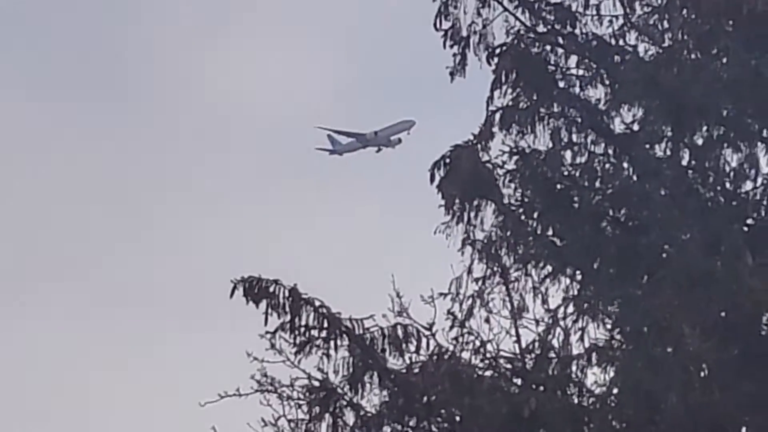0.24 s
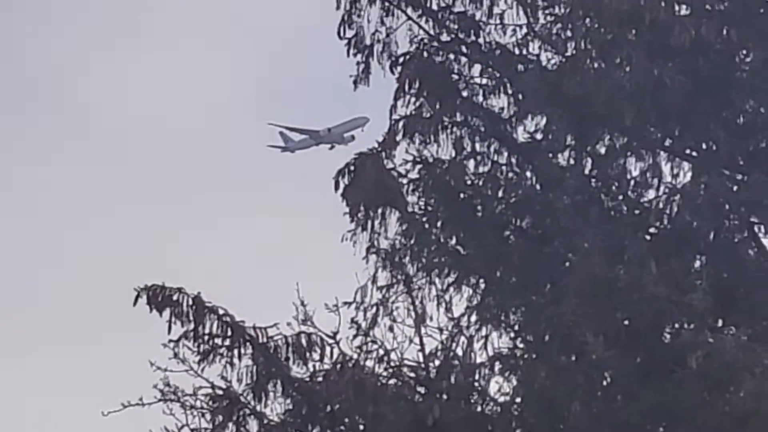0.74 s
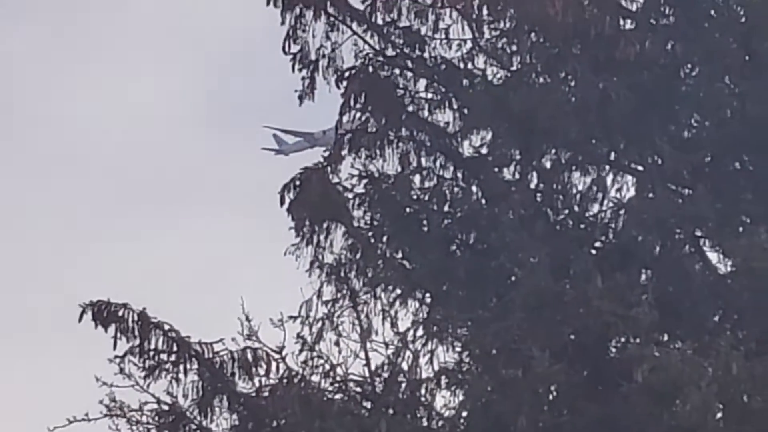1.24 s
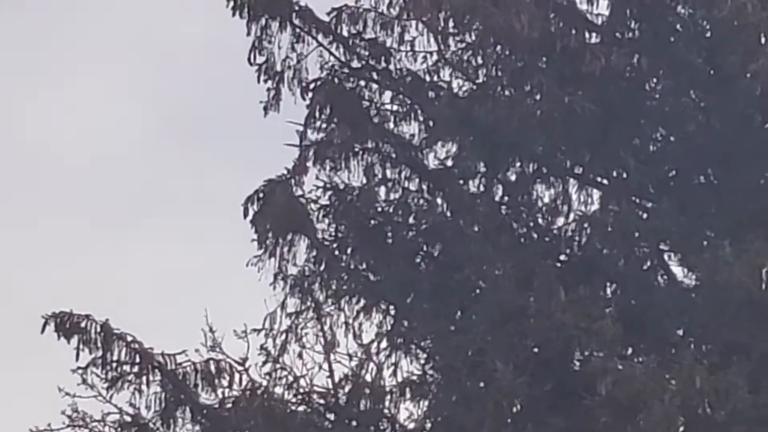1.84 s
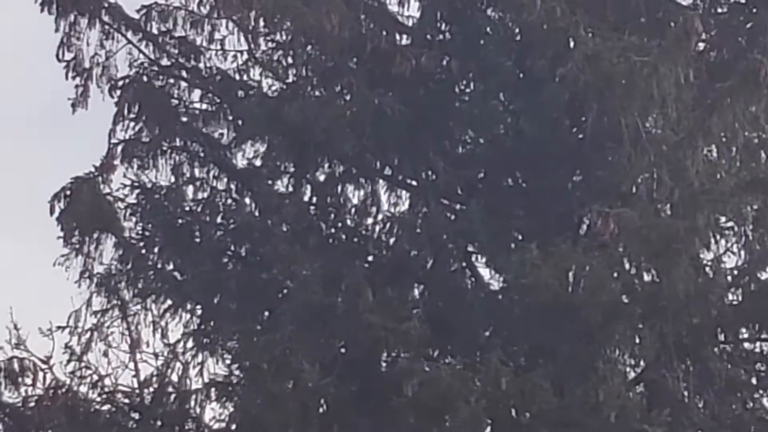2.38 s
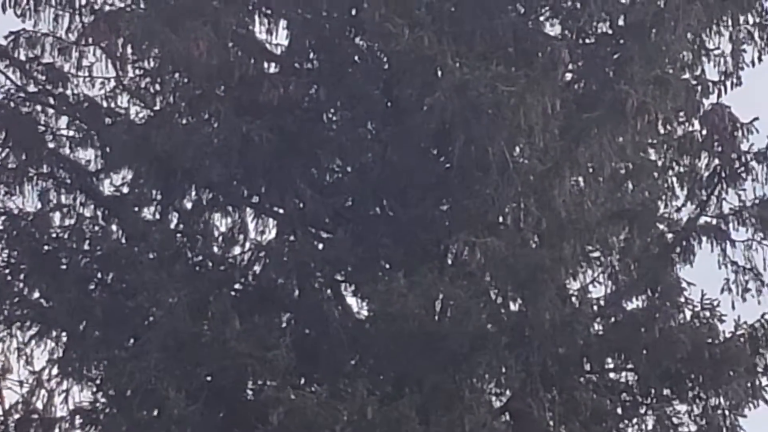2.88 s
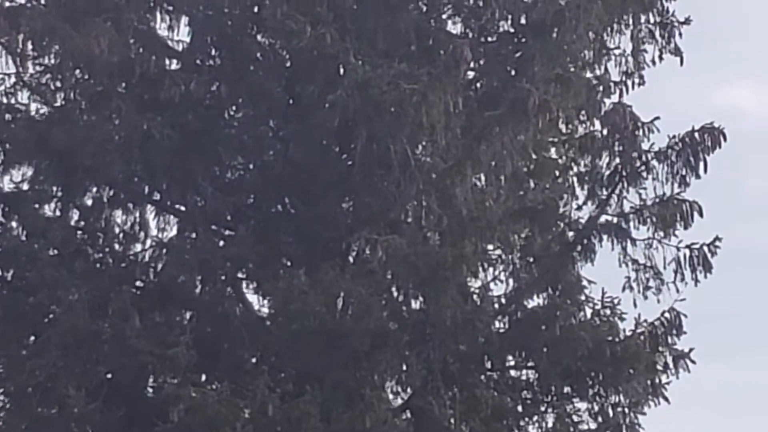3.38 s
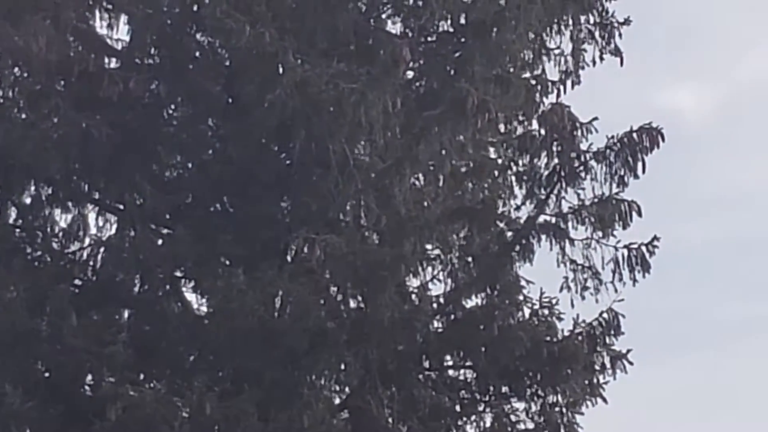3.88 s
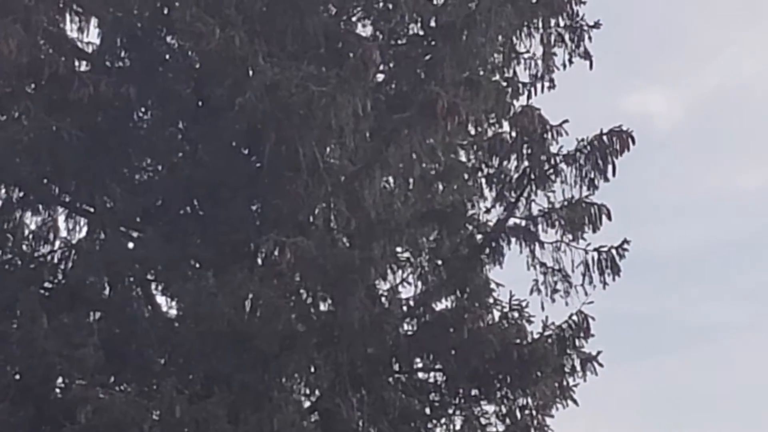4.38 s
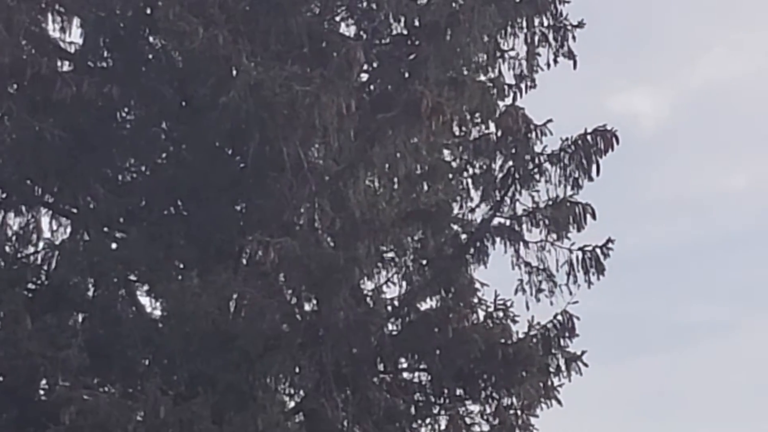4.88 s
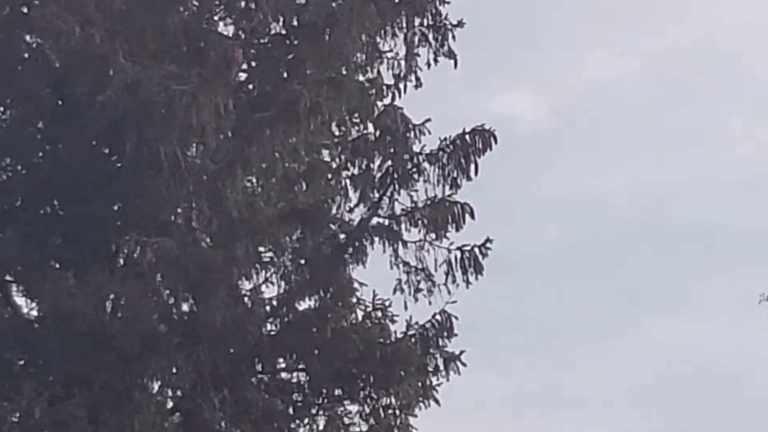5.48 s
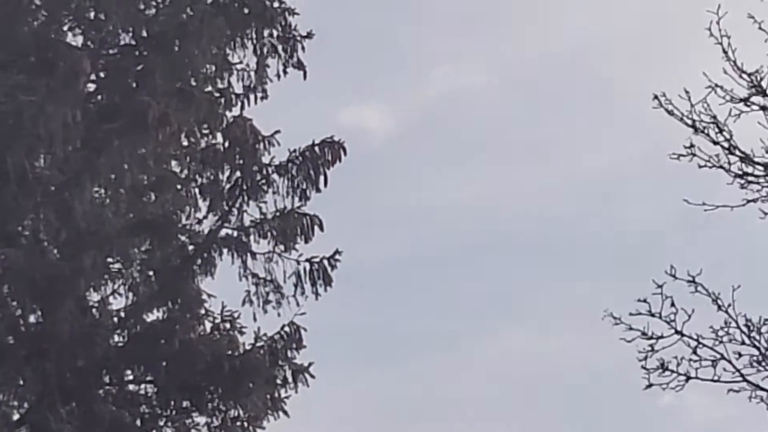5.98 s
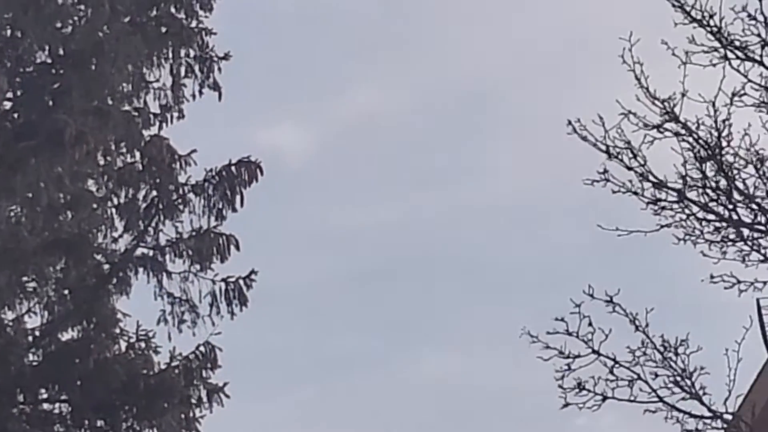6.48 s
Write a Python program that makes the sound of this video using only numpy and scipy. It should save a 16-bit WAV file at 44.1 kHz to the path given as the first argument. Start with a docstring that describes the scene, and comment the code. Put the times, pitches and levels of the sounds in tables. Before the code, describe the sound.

A distant jet airliner rumbles steadily overhead while small songbirds chirp and whistle in the surrounding trees.

```python
"""A rumble and roar fill the sky: the turbulent exhaust of a jet airliner far overhead, swelling and
fading in the moving air, with a fuzzy engine drone that sinks slowly in pitch as the jet recedes.
Songbirds call with gliding tones of the syrinx; conifers scatter each call into a short tail, and
buildings echo the nearer ones. Close by, something rustles and snaps over a faint microphone hiss."""
import sys
import numpy as np
from scipy import signal
from scipy.fft import rfft, irfft, next_fast_len
from scipy.io import wavfile
from scipy.ndimage import uniform_filter1d, map_coordinates

SR = 44100
rng = np.random.default_rng(int(sys.argv[2]) if len(sys.argv) > 2 else 0)


def output_pcm(signal):
    """Save a mono or channel-first signal as 16-bit PCM at the path in sys.argv[1].

    Samples are clipped to [-1, 1] before scaling.
    """
    pcm = np.clip(np.atleast_2d(signal).T, -1, 1) * 32767
    wavfile.write(sys.argv[1], SR, np.round(pcm).astype(np.int16))


N = 296793


def amp(db):
    """Decibels to amplitude gain."""
    return 10 ** (np.asarray(db) / 20)


def unit(x):
    """Normalisation to rms 1."""
    return x / np.sqrt(np.mean(x ** 2) + 1e-20)


def along(points, hz):
    """Interpolation of (Hz, value) points on a logarithmic frequency axis."""
    knots_hz, values = np.transpose(points)
    return np.interp(np.log(hz + 1), np.log(knots_hz + 1), values)


def curves(rows, size=N):
    """Linear interpolation in time: one value per sample for each column after the first."""
    times, *columns = np.transpose(rows)
    return [np.interp(np.arange(size) / SR, times, column) for column in columns]


def wobble(rate, size=N):
    """Smooth random modulation: a spline through rate random knots a second."""
    knots = rng.standard_normal(int(size * rate / SR) + 4)
    return map_coordinates(knots, [np.arange(size) * rate / SR])


def filtered(x, response):
    """Linear filtering: the spectrum of x times a complex response of frequency."""
    size = x.shape[-1]
    padded = next_fast_len(size + SR // 8)
    return irfft(rfft(x, padded) * response(np.fft.rfftfreq(padded, 1 / SR)), padded)[..., :size]


def coloured_noise(spectrum):
    """Spectral shaping: independent white noise in each channel, weighted by (Hz, dB) points."""
    return filtered(rng.standard_normal((2, N)), lambda hz: amp(along(spectrum, hz)))


def add(track, start_s, sound):
    """Superposition: the sound is summed into the track from start_s on."""
    part = track[..., max(round(start_s * SR), 0):][..., :sound.shape[-1]]
    part += sound[..., :part.shape[-1]]


def placed(x, lead_ms, pan_db):
    """Time and level cues to direction: the left channel is earlier by lead_ms and louder by pan_db."""
    half = np.array([[.5], [-.5]])
    return filtered(x, lambda hz: amp(half * pan_db) * np.exp(2j * np.pi * hz * half * lead_ms / 1000))


# Spectrum of the hiss. Each row: frequency in Hz, relative spectral density in dB.
HISS_SPECTRUM = [(1000, -8), (4000, -4), (7500, -5), (10000, -3), (13000, -1), (16000, 0)]

def hiss(level_db=-76.5):
    """Self-noise of the microphone: steady, and uncorrelated between the channels."""
    return amp(level_db) * unit(coloured_noise(HISS_SPECTRUM))


# Close scrapes. Each row: start in seconds, length in seconds, level in dB.
SCRAPES = [(3.35, .03, -73), (3.835, .04, -65), (4.01, .04, -70), (4.125, .05, -64), (4.15, .03, -60),
           (4.32, .035, -67), (4.428, .035, -71)]
# Their spectrum. Each row: frequency in Hz, relative spectral density in dB.
RUSTLE_SPECTRUM = [(1500, -20), (4500, 3), (7500, -8), (10000, -4), (13000, -1), (15500, 2)]

def rustle(grain_db=2.5, crackle_db=-73, crackle_start_s=2.9, crackle_length_s=2.1):
    """Random amplitude modulation breaks noise into grains: dry scrapes over a faint swell of crackle."""
    envelope = np.zeros(N)
    add(envelope, crackle_start_s, amp(crackle_db) * np.hanning(round(crackle_length_s * SR)))
    for start_s, length_s, db in SCRAPES:
        add(envelope, start_s, amp(db) * np.hanning(round(length_s * SR)))
    grains = unit(coloured_noise(RUSTLE_SPECTRUM) * amp(grain_db * wobble(280)))
    return placed(envelope * grains, lead_ms=0, pan_db=6)


# Dry snaps among the scrapes. Each row: start in seconds, level in dB.
SNAP_EVENTS = [(3.971, -54), (4.179, -48)]
# Their spectrum. Each row: frequency in Hz, relative spectral density in dB.
SNAP_SPECTRUM = [(1000, -10), (3500, 6), (5000, 3), (7500, -6), (11000, -3), (15500, -3)]

def snaps(t60_s=.025):
    """Damped transients: little cracks of noise with a sudden onset and an exponential decay."""
    t = np.arange(SR // 10) / SR
    envelope = np.zeros(N)
    for start_s, db in SNAP_EVENTS:
        add(envelope, start_s, amp(db - 60 * t / t60_s))
    return envelope * unit(coloured_noise(SNAP_SPECTRUM))


# Reverberation of the conifers. Each row: frequency in Hz, time to decay by 60 dB in seconds.
TREE_T60 = [(2000, 0.5), (4500, 0.74), (7000, 0.86), (15000, 0.082)]

def among_trees(x, wet_db, early_gain=0.94, early_t60_s=0.082):
    """Multiple scattering by trunks and branches: a quick dense answer, then a longer tail."""
    hz, t, noise = signal.stft(rng.standard_normal((2, SR * 3 // 4)), SR, nperseg=256)
    late = amp(-60 * t / along(TREE_T60, hz)[:, None])
    early = early_gain * amp(-60 * t / early_t60_s)
    response = signal.istft(noise * (late + early) * (t > 0), SR, nperseg=256)[1]
    response /= np.linalg.norm(response[0])
    return amp(wet_db) * signal.fftconvolve(x[None], response, axes=1)[:, :len(x)]


def syllable(shape, rough, octave_db, trill=0, trill_hz=130, flutter_db=3, jitter_per_s=600):
    """One side of a syrinx as an oscillator: a gliding tone, frequency-modulated by jitter and trill."""
    t = np.arange(SR) / SR
    pitch, level = curves(shape, size=SR)
    gate = np.clip(np.minimum(t - shape[0][0], shape[-1][0] - t) / .004, 0, 1)  # 4 ms ramps
    jitter = rough * wobble(jitter_per_s, size=SR)
    vibrato = trill * np.sin(2 * np.pi * trill_hz * t)
    phase = 2 * np.pi * np.cumsum(pitch * (1 + jitter + vibrato)) / SR
    envelope = gate * amp(level + flutter_db * wobble(120, size=SR))
    return envelope * (np.sin(phase) + amp(octave_db) * np.sin(2 * phase))


# Distant chips. Each row: start and length in seconds, first, middle and last pitch in Hz,
# relative level in dB.
FAR_CHIPS = [(.47, 0.093, 2304, 2900, 2680, -57), (0.542, .091, 2700, 2820, 3110, -55.5),
             (1.706, 0.061, 3410, 3970, 6050, -54), (1.727, .049, 4700, 3900, 2845, -52.5),
             (1.865, 0.097, 2950, 3450, 2930, -56.5), (2.259, 0.064, 3700, 3130, 2785, -51.5),
             (2.335, 0.045, 3620, 3290, 2950, -53.5), (2.786, 0.085, 4230, 3490, 3310, -55),
             (3.439, 0.043, 5560, 4930, 4830, -61.5), (3.469, 0.044, 3740, 3350, 3030, -53.5),
             (3.57, 0.074, 3600, 4170, 4440, -51.5), (4.172, 0.072, 3740, 3240, 2920, -56.5),
             (4.791, 0.063, 3430, 3370, 2910, -56), (5.245, .1, 3610, 4550, 3670, -66),
             (5.593, 0.074, 5260, 4880, 4400, -63), (5.668, 0.075, 3200, 3780, 3960, -55.5),
             (5.718, .048, 4320, 4600, 4200, -53.5), (5.723, 0.039, 3630, 3210, 2910, -54),
             (6.608, 0.081, 3460, 3190, 2860, -61.5)]

def far_birds(level_db=-2):
    """Short husky chips from deep in the trees, where scattered sound outweighs the direct path."""
    out = np.zeros((2, N))
    for start_s, length_s, first_hz, middle_hz, last_hz, db in FAR_CHIPS:
        shape = [(0, first_hz, -8), (length_s / 2, middle_hz, 0), (length_s, last_hz, -8)]
        voice = amp(db + level_db) * syllable(shape, rough=.055, octave_db=-29.5, jitter_per_s=1200)
        add(out, start_s, placed(voice, lead_ms=-0.036, pan_db=8) + among_trees(voice, wet_db=3.5))
    return out


# Syllables of the rising call. Each row: time in the call in seconds, pitch in Hz, relative level in dB.
SQUEAK = [(0, 5030, -26.5), (.02, 5460, -21), (.045, 5960, -30)]
RISE = [(0, 2850, -26.5), (.025, 3080, -8), (.045, 3310, -3.5), (.058, 3780, -5), (.082, 4170, -1.5),
        (.105, 4460, -6), (.125, 4140, -3.5), (.145, 4000, -19)]

def upslur(tune):
    """A rising call, made husky by fast frequency modulation, opens with a thin high squeak."""
    squeak = syllable(SQUEAK * tune, rough=0.048, octave_db=-53, jitter_per_s=1500)
    rise = syllable(RISE * tune, rough=.025, octave_db=-41, trill=0.026, trill_hz=126.2)
    return squeak + rise


# Syllables of the whistle. Each row: time in the call in seconds, pitch in Hz, relative level in dB.
CLEAR_NOTE = [(0, 4650, 5.5), (.008, 4783, -8.5), (.042, 4803, 1.5), (.054, 4700, -1.5), (.064, 4390, -33)]
FALLING_LISP = [(.058, 6850, -25), (.075, 6580, -24), (.115, 6150, -14.5), (.126, 5710, -23)]
LAST_NOTE = [(.12, 4450, -17), (.128, 4330, -3.5), (.145, 4280, -7.5), (.16, 4274, -27)]

def whistle(tune):
    """Nearly sinusoidal oscillation: a clean note, a thin falling lisp and a lower last note."""
    lisp = syllable(FALLING_LISP * tune, rough=0.018, octave_db=-47)
    clear_note = syllable(CLEAR_NOTE * tune, rough=0.0025, octave_db=-34)
    last_note = syllable(LAST_NOTE * tune, rough=.004, octave_db=-39)
    return clear_note + lisp + last_note


# Syllables of the chirrup. Each row: time in the call in seconds, pitch in Hz, relative level in dB.
FALLING_RASP = [(0, 5300, -36), (.02, 5200, -15), (.035, 4700, -15.5), (.05, 4150, -9.5),
                (.075, 3700, -13.5), (.09, 4200, -8.5), (.11, 4300, -18)]
LOWER_VOICE = [(.005, 2654, -24.5), (.025, 2650, -13.5), (.045, 2500, -26), (.085, 2900, -22),
               (.105, 2620, -12), (.12, 2770, 1.5), (.155, 2738, -8), (.172, 2880, -27)]
UPPER_VOICE = [(.105, 3010, -18.5), (.125, 3180, -8.5), (.155, 3150, -10.5), (.172, 3100, -21)]

def chirrup(tune, lower_ratio=0.67, lower_db=-6):
    """Biphonation: both sides of the syrinx rasp in a falling tumble, then land on a two-voiced note."""
    rasp = syllable(FALLING_RASP * tune, rough=0.09, octave_db=-43, trill=.04, trill_hz=84.3,
                    flutter_db=0.5, jitter_per_s=1800)
    lower_shape = FALLING_RASP[2:] * tune * [1, lower_ratio, 1]
    rasp += amp(lower_db) * syllable(lower_shape, rough=.11, octave_db=-25, jitter_per_s=1500)
    lower_voice = syllable(LOWER_VOICE * tune, rough=0.036, octave_db=-30)
    upper_voice = syllable(UPPER_VOICE * tune, rough=.025, octave_db=-23.5)
    return rasp + lower_voice + upper_voice


# Echoes from nearby buildings. Each row: delay in seconds, relative level in dB.
WALL_ECHOES = [(.083, -14), (.15, -19.5), (.21, -21)]

def bird(calls, song, wet_db, echo_db, lead_ms, pan_db):
    """Multipath propagation: each call arrives directly, scattered by trees and reflected by walls."""
    out = np.zeros((2, N))
    for start_s, db, pitch_ratio in calls:
        tune = np.array([1, pitch_ratio, 1])  # scales only a syllable's pitch column
        voice = amp(db) * song(tune)
        direct = placed(voice, lead_ms, pan_db)
        scattered = placed(among_trees(voice, wet_db), 0, pan_db)
        add(out, start_s, direct + scattered)
        for delay_s, wall_db in WALL_ECHOES:
            echo = placed(voice, lead_ms=rng.normal(0, .2), pan_db=0)
            add(out, start_s + delay_s, amp(wall_db + echo_db) * echo)
    return out


# Calls of the three nearer birds. Each row: start in seconds, gain in dB, pitch ratio.
UPSLUR_CALLS = [(.134, -36, 1), (.926, -37.5, 1.01)]
WHISTLE_CALLS = [(.462, -51.5, 0.99), (1.035, -54, 1), (1.668, -51.5, 1), (2.25, -52.5, 1),
                 (2.835, -49.5, 0.98), (3.632, -49.5, 1), (4.752, -53.5, 0.98), (6.048, -48.5, .995)]
CHIRRUP_CALLS = [(2.508, -38, 1.014), (4.628, -40.5, .98), (6.272, -39.5, 1.005)]

def near_birds():
    """Stationary point sources: three perched birds repeat their songs, each from its own direction."""
    return (bird(UPSLUR_CALLS, upslur, wet_db=-4.5, echo_db=-11.5, lead_ms=-0.12, pan_db=1.7)
            + bird(WHISTLE_CALLS, whistle, wet_db=-3.5, echo_db=3.5, lead_ms=0.27, pan_db=-2)
            + bird(CHIRRUP_CALLS, chirrup, wet_db=-6, echo_db=-18, lead_ms=-0.069, pan_db=3.5))


# Fading of the engine drone in the moving air. Each row: time in seconds, level in dB.
DRONE_FADING = [(0.0, -47), (0.27, -40), (1.32, -44), (1.5, -36.5), (1.62, -45), (2.58, -46.5), (3.03, -59),
                (3.15, -39.5), (3.39, -62), (3.51, -34.5), (3.6, -34.5), (3.84, -53), (4.92, -38),
                (5.22, -60), (5.4, -42), (6.06, -40), (6.21, -51.5), (6.72, -39.0)]
# Its pitch, which sinks as the jet recedes. Each row: time in seconds, pitch in Hz.
DRONE_GLIDE = [(0, 572.3), (1.4, 588.5), (2.4, 583.4), (3.55, 553), (4.85, 531.4), (6.73, 521.2)]

def drone(skirt_width_hz=62, core_width_hz=16, core_db=-2, side_db=-11):
    """Spectral broadening: an engine tone with a narrow core and a skirt smeared by many air paths."""
    (level,), (pitch,) = curves(DRONE_FADING), curves(DRONE_GLIDE)
    carrier = np.exp(2j * np.pi * np.cumsum(pitch) / SR)
    smears = [wobble(skirt_width_hz) + 1j * wobble(skirt_width_hz) for _ in range(2)]
    skirt, side_skirt = np.real(carrier * np.array(smears))
    core = np.real(carrier * np.exp(1j * np.pi * wobble(core_width_hz) / 2))
    mid = unit(skirt) + amp(core_db) * unit(core)
    side = amp(side_db) * side_skirt
    return amp(level) * unit(np.array([mid + side, mid - side]))


# Likeness of the exhaust noise in the two channels. Each row: frequency in Hz, coherence from 0 to 1.
COHERENCE = [(60, .66), (130, .73), (300, .8), (600, .86), (1000, .78), (1600, .6), (3000, .2), (8000, 0)]

def partly_coherent(pair):
    """Partial coherence: two independent noises, mixed as mid and side, are most alike in the middle."""
    def mid_side_gains(hz):
        angle = np.arccos(along(COHERENCE, hz)) / 2
        return np.array([np.cos(angle), np.sin(angle)])
    mid, side = filtered(pair, mid_side_gains)
    return np.array([mid + side, mid - side])


def eddy_noise(spectra, rear_share, patchy_db):
    """Directivity: the noise changes colour as the tail turns; turbulent air focuses and dims patches."""
    white = signal.stft(rng.standard_normal((2, N)), nperseg=2048)[2]
    patches = uniform_filter1d(rng.standard_normal(white.shape[1:]), size=3, axis=0)  # across frequency
    patches = uniform_filter1d(patches, size=9, axis=1)  # across time
    pair = signal.istft(white * amp(patchy_db * unit(patches)), nperseg=2048)[1][:, :N]
    noise = partly_coherent(pair)
    knots_hz, side_db, rear_db = np.transpose(spectra)
    from_side = unit(filtered(noise, lambda hz: amp(along(np.c_[knots_hz, side_db], hz))))
    from_rear = unit(filtered(noise, lambda hz: amp(along(np.c_[knots_hz, rear_db], hz))))
    return (1 - rear_share) * from_side + rear_share * from_rear


# Spectra of the large, middle and fine eddies. Each row: frequency in Hz, relative spectral density
# in dB from the side, the same from behind.
RUMBLE_SPECTRA = [(18, -25, -23.5), (31.6, -11, -15), (47.4, -9, -8.5), (63.5, 0, -1), (81, -4, 0.5),
                  (104.2, 1, 0.5), (120.4, -7, -8.5), (159, -25, -24), (600, -120, -120)]
BODY_SPECTRA = [(70, -30, -32.5), (123, -7, -3.5), (165, -0.5, 1.5), (227, -5, -5.5), (338, -6.5, -4.5),
                (440, -20, -8), (625, -21.5, -13.5), (3000, -120, -120)]
ROAR_SPECTRA = [(195, -23.5, -27.5), (417, -3.5, -8.5), (454, 4, -1.5), (630, 0.5, 3), (797, -4, -4),
                (1233, -8.5, -9.5), (1518, -15.5, -15.5), (2200, -24, -25), (2660, -28, -30.5),
                (4000, -31, -32), (5900, -53, -47), (9050, -75, -69.5)]
# Their swelling and fading on the long path. Each row: time in seconds, relative level in dB.
RUMBLE_FADING = [(0, -32.5), (0.14, -26), (0.64, -28.0), (0.75, -22.5), (0.9, -20.5), (1.05, -32),
                 (1.22, -28.5), (2.1, -39.5), (2.6, -36.0), (2.99, -43.0), (3.5, -32.0), (4.1, -36),
                 (4.3, -32), (4.87, -29), (5.5, -35), (5.65, -26), (6.27, -27.5), (6.42, -33.5),
                 (6.72, -31)]
BODY_FADING = [(0.0, -38.5), (0.51, -31), (0.96, -32), (1.41, -40.5), (2.58, -45.5), (2.79, -42.5),
               (2.97, -48.5), (3.18, -43), (4.65, -37.5), (5.37, -39.0), (5.73, -32.0), (6.72, -39.5)]
ROAR_FADING = [(0.0, -41.5), (0.13, -44), (0.22, -38.5), (0.41, -42), (1.12, -41.5), (2.96, -46.5),
               (3.69, -41.5), (5.08, -41.5), (5.53, -42), (6.07, -38.5), (6.43, -45), (6.73, -42)]
# The tail turning towards the listener. Each row: time in seconds, share of the sound from behind.
REAR_SHARE = [(1.5, 0), (4.5, 1)]

def exhaust(body_db=1.5, roar_db=3, throb_per_s=17, side_throb_db=3, rear_throb_db=1, body_throb=0.35):
    """Turbulent mixing noise: large eddies rumble and throb, middle ones add body, fine ones roar."""
    (rumble_level,), (body_level,) = curves(RUMBLE_FADING), curves(BODY_FADING)
    (roar_level,), (rear_share,) = curves(ROAR_FADING), curves(REAR_SHARE)
    depth_db = (1 - rear_share) * side_throb_db + rear_share * rear_throb_db
    throb = depth_db * wobble(throb_per_s)
    rumble = amp(rumble_level + throb) * eddy_noise(RUMBLE_SPECTRA, rear_share, patchy_db=0.5)
    body_gain = amp(body_level + body_db + body_throb * throb)
    body = body_gain * eddy_noise(BODY_SPECTRA, rear_share, patchy_db=1.5)
    roar_gain = amp(roar_level + roar_db + .9 * wobble(12))
    roar = roar_gain * eddy_noise(ROAR_SPECTRA, rear_share, patchy_db=2)
    return rumble + body + roar


def jet():
    """A distant source is compact: exhaust and engine drone arrive from one direction."""
    return placed(exhaust() + drone(), lead_ms=0.17, pan_db=1.25)


def scene():
    """Superposition of independent sources: birds around, the jet above, small noises close by."""
    return near_birds() + jet() + far_birds() + rustle() + snaps() + hiss()


def record(dry, top_hz=15780):
    """Band limiting: an ideal low-pass filter passes nothing above top_hz."""
    return filtered(dry, lambda hz: hz < top_hz)


dry = scene()
out = record(dry)
output_pcm(out)
```